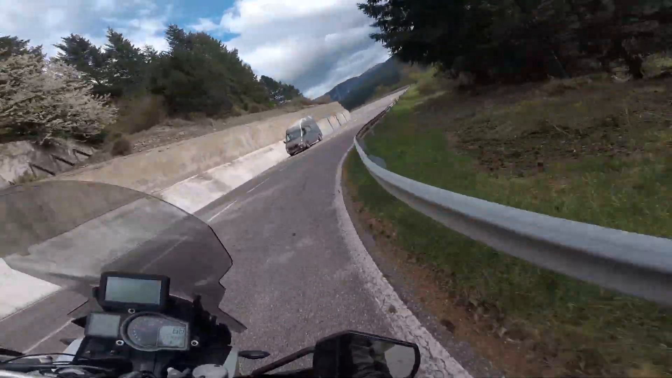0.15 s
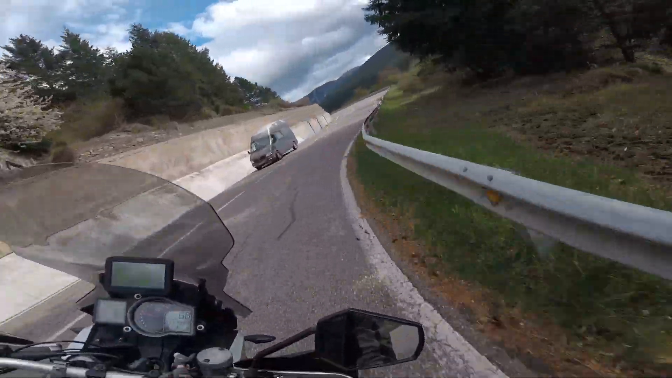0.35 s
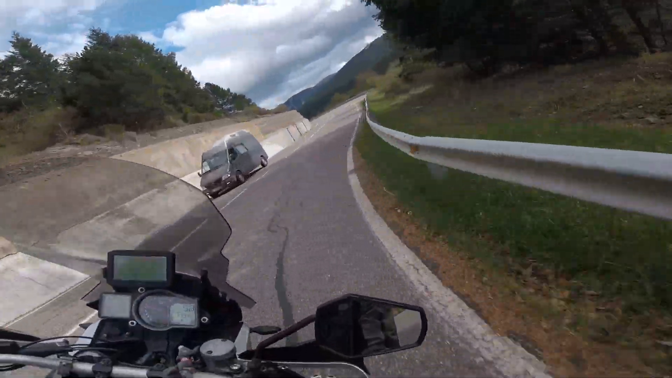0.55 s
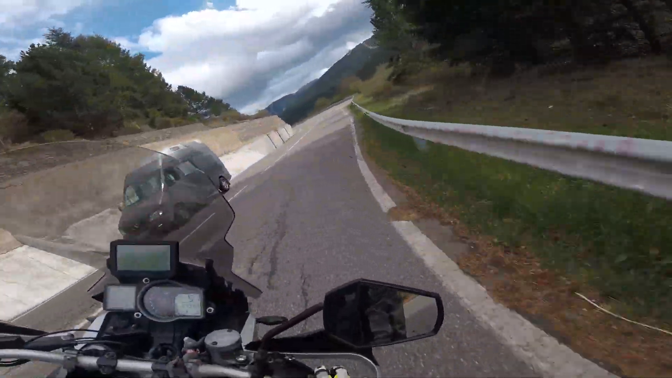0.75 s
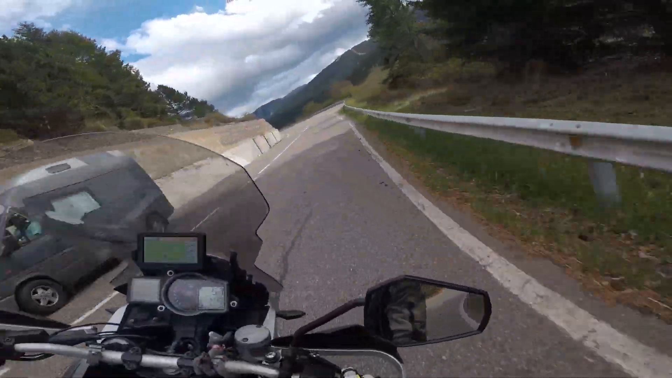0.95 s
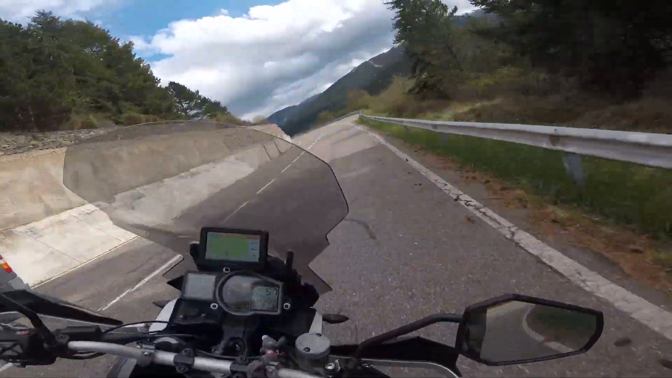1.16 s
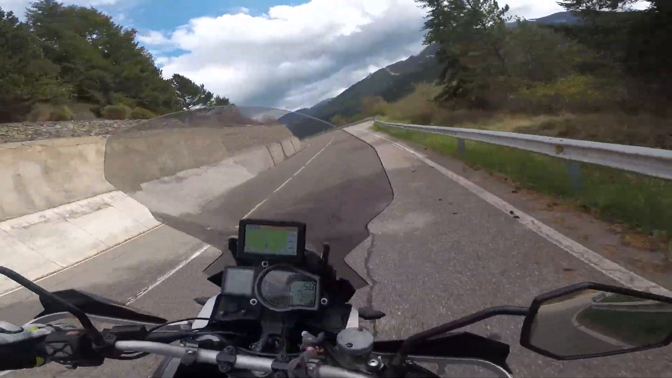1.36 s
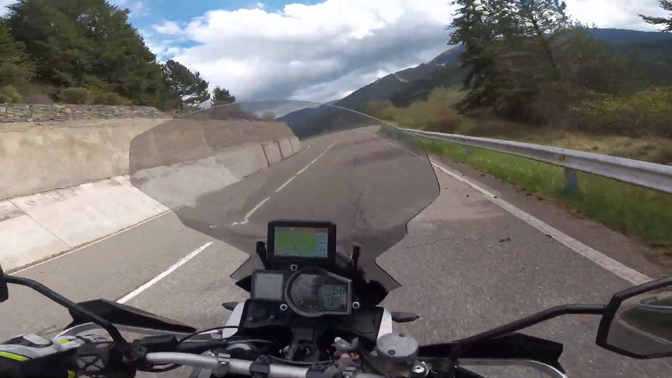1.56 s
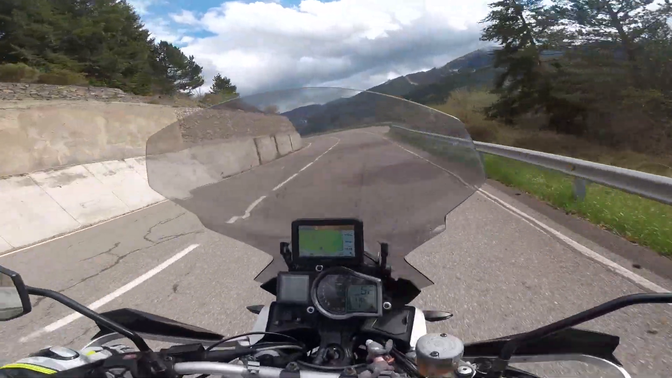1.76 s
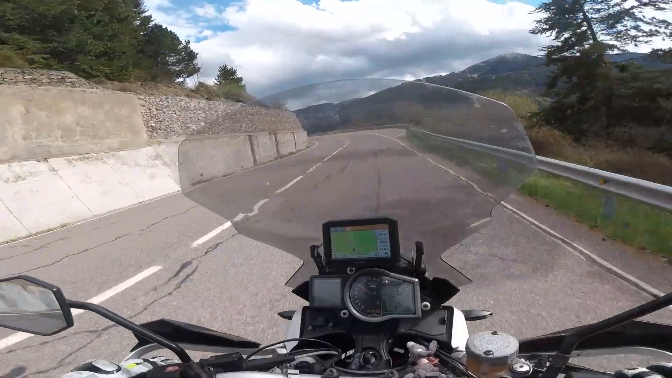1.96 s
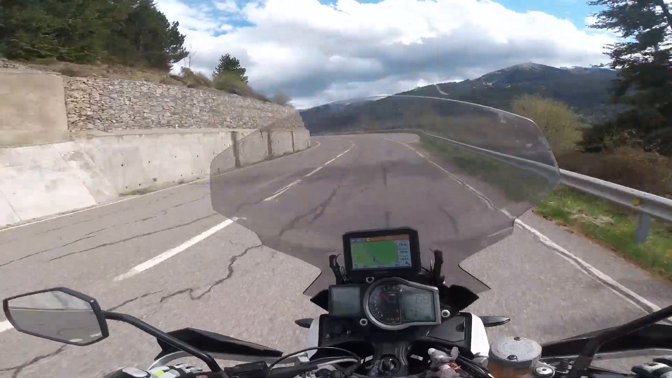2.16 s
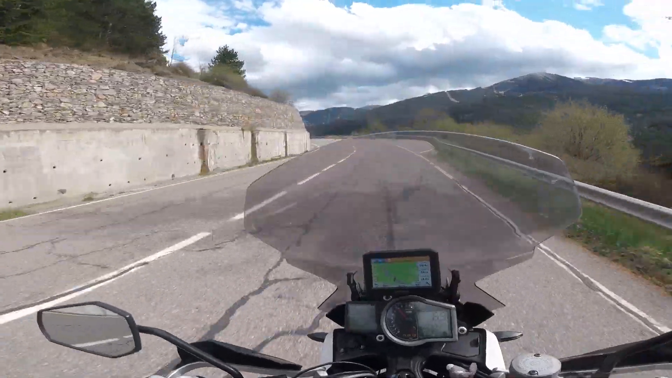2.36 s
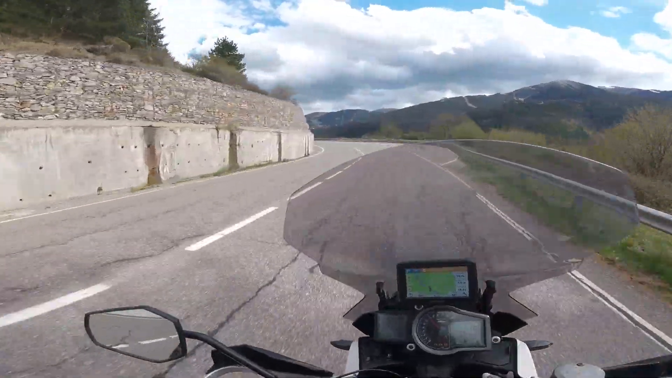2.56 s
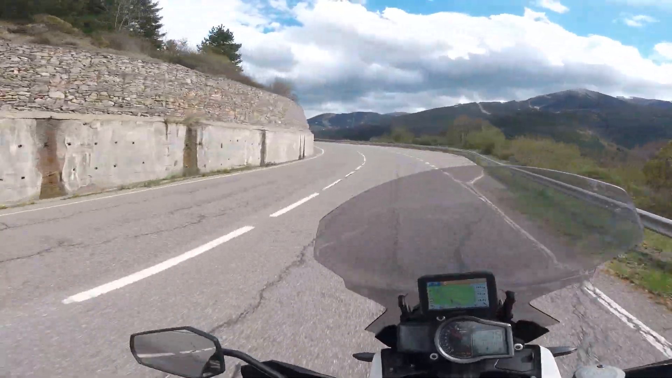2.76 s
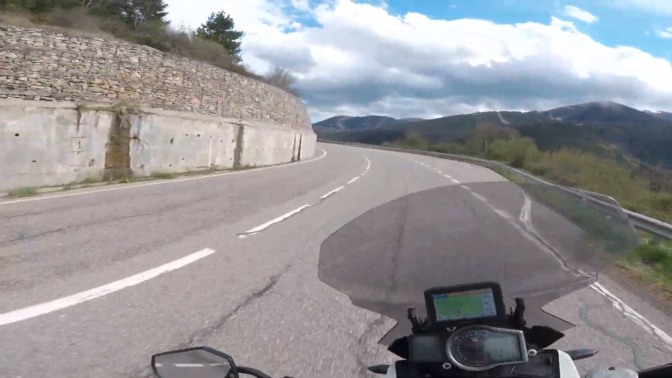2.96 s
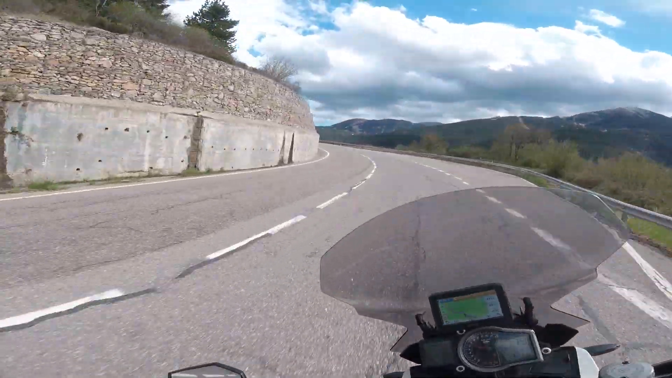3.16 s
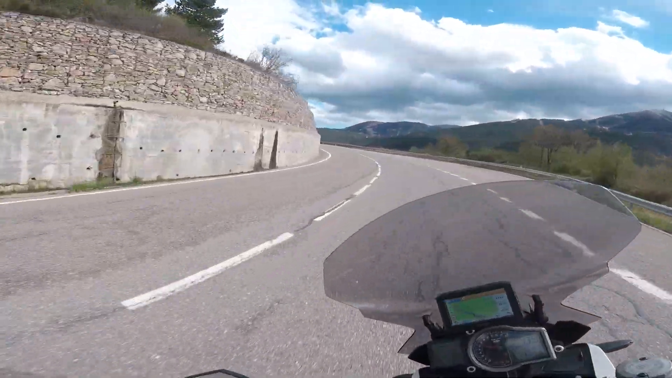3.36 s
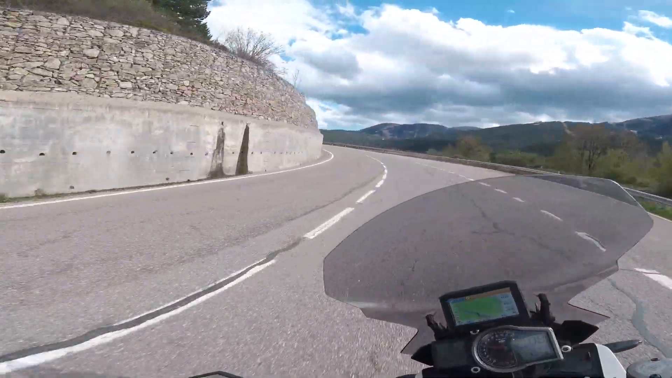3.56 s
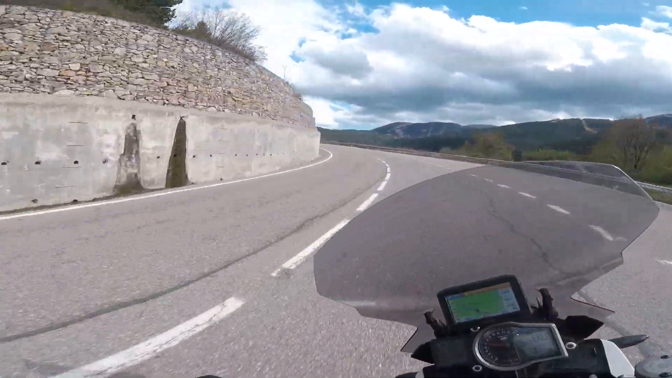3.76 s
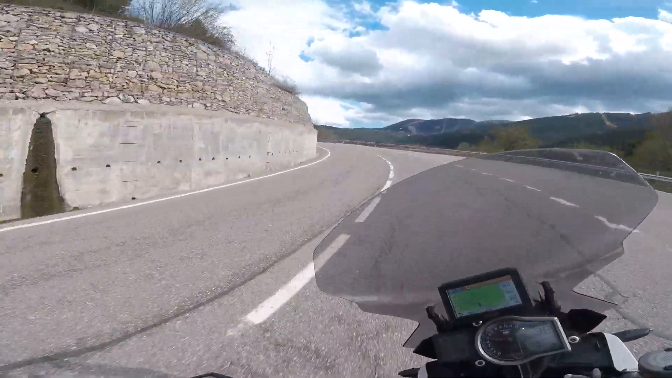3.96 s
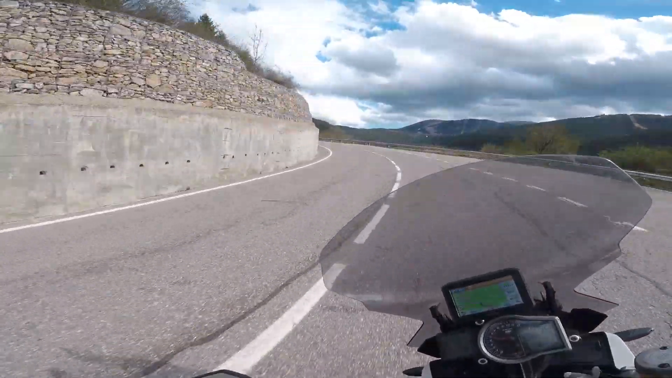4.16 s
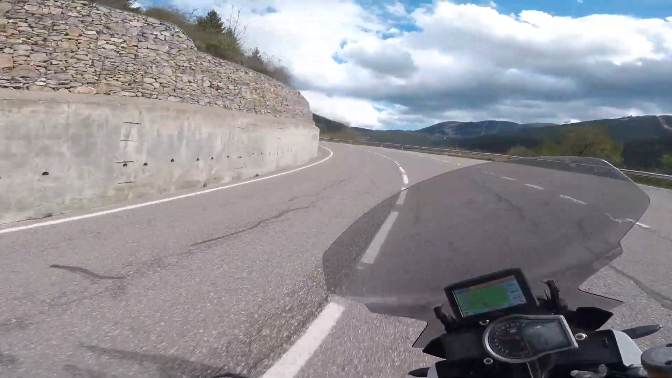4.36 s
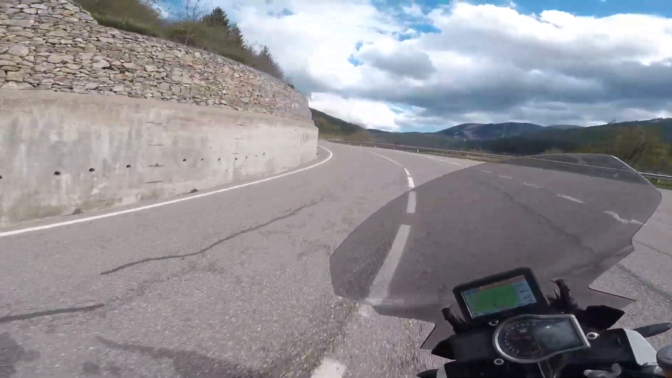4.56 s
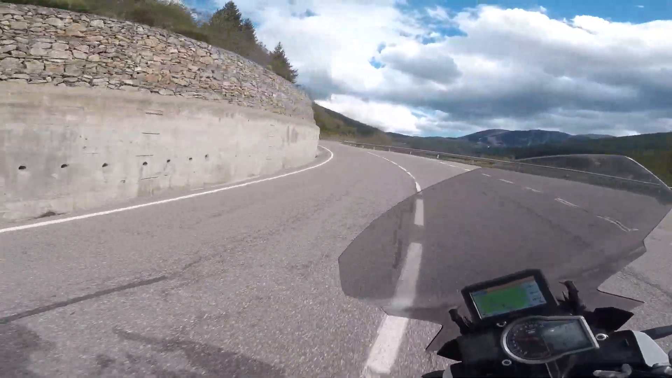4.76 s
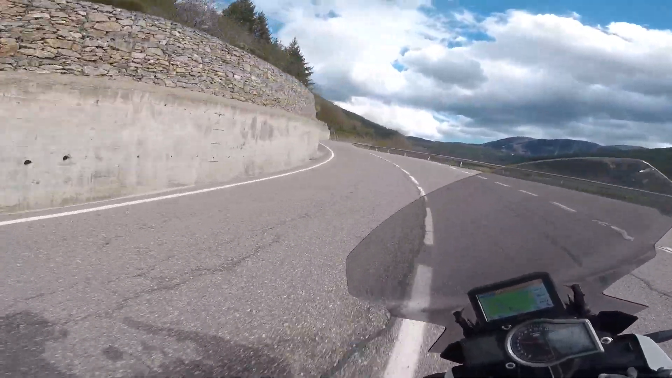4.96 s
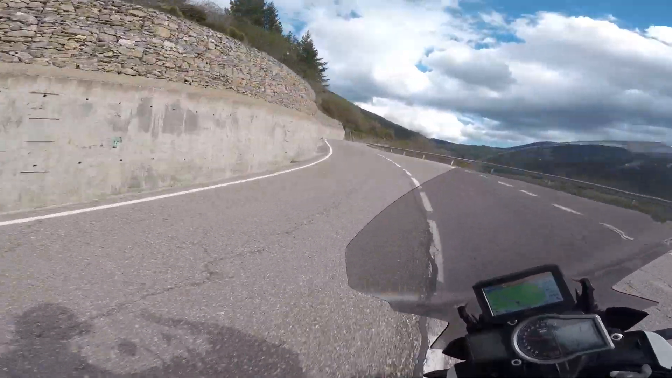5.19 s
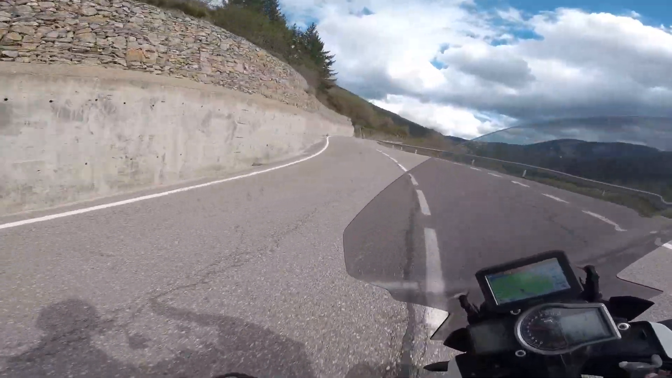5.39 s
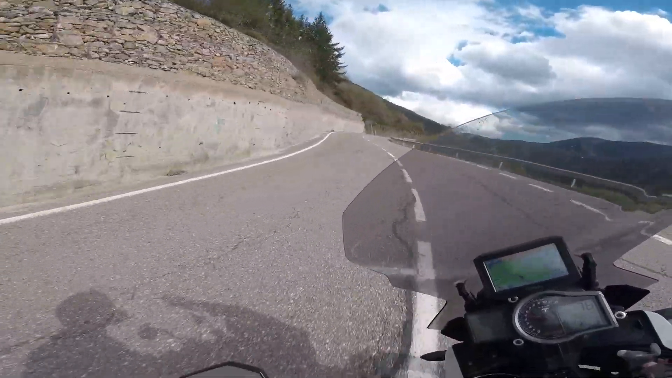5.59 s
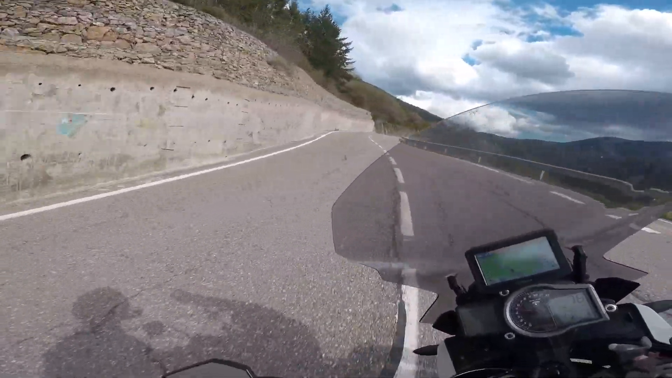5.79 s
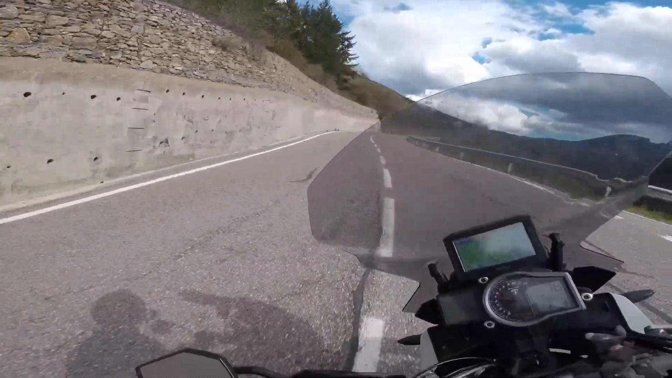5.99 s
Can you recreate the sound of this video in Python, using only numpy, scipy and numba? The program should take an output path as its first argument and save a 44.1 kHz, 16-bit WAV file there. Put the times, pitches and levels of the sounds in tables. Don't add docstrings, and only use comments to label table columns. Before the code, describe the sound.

From the saddle, a V-twin motorcycle pulls hard with barking intake, shuts off with popping exhaust cracks, then drones steadily through a bend in gusting wind.

```python
import sys
import numpy as np
from scipy import signal
from scipy.fft import rfft, irfft, next_fast_len
from scipy.io import wavfile
from scipy.ndimage import uniform_filter1d
from numba import njit

SR = 44100
rng = np.random.default_rng(int(sys.argv[2]) if len(sys.argv) > 2 else 0)


def gain_from_db(level_db):
    decades = np.asarray(level_db, float) / 20
    return 10 ** decades


def inscribe(sig):
    pcm = np.round(np.clip(np.atleast_2d(sig).T, -1, 1) * 32767)
    wavfile.write(sys.argv[1], SR, pcm.astype(np.int16))


N = 265923

# (time [s], peak level [dB], ring [Hz], spray level [dB])
POPS = [
    (2.352, -24, 480, -63),
    (2.389, -19, 299.6, -50),
    (2.55, -34.5, 497, -63.5),
    (2.652, -15, 465.3, -58),
    (2.660, -29.5, 509, -55),
    (2.699, -19.5, 332.9, -63),
    (3.659, -15.5, 485, -65),
    (3.735, -12.5, 306.5, -65),
    (3.973, -41, 355, -58),
]
# (time [s], swing of cycle rate [Hz])
SNATCHES = [
    (1.106, 0.926),
    (2.701, .4),
    (3.906, .8),
]


def controls(table):
    s, *columns = np.transpose(table)
    return [np.interp(np.arange(N) / SR, s, column) for column in columns]


def curve(table, hz):
    f, value = np.transpose(table)
    return np.interp(np.log(np.maximum(hz, 1)), np.log(f), value)


def bump(s, half_s):
    return np.exp(-((np.arange(N) / SR - s) / half_s) ** 2)


def unit(x):
    return x / np.sqrt(np.mean(x ** 2))


def soft(x, hz):
    return signal.sosfilt(signal.butter(4, hz, fs=SR, output="sos"), x)


def decaying(x, fall_s):
    return signal.lfilter([1], [1, -np.exp(-1 / (fall_s * SR))], x)


@njit
def sweep(x, hz, width):
    y, b, l = np.empty(len(x)), 0., 0.
    for i in range(len(x)):
        g, k = np.tan(np.pi * hz[i] / SR), width[i] / hz[i]
        v = (b + g * (x[i] - l)) / (1 + g * (g + k))
        b, l, y[i] = 2 * v - b, l + 2 * g * v, k * v
    return y


def svf(x, hz, width_hz):
    return sweep(x, hz, width_hz + np.zeros(N))


def ring(x, modes, sign=-1):
    total = 0
    for k, (hz, width_hz, db) in enumerate(modes):
        total = total + sign ** k * gain_from_db(db) * svf(x, np.full(N, 1. * hz), 1. * width_hz)
    return total


def panned(x, pan_db, lag_samples):
    late = np.interp(np.arange(N) - lag_samples, np.arange(N), x)
    return np.array([x * gain_from_db(pan_db / 2), late * gain_from_db(-pan_db / 2)])


def walk(rate_hz):
    k = int(SR / rate_hz)
    held = np.repeat(rng.standard_normal(N // k + 1), k)
    return 0.46 * uniform_filter1d(uniform_filter1d(held, k), k)[:N]


def noise(colour, flicker_db, rate_hz):
    # (frequency [Hz], correlation [0-1])
    likeness = [(30, 0.974), (70, 0.917), (150, 0.27), (600, 0.82), (1200, 0.65), (2500, 0.17),
                (4000, 0.61), (12000, 0.28)]
    size = next_fast_len(N)
    hz = np.arange(size // 2 + 1) * SR / size
    alike = np.clip(curve(likeness, hz), 0, 1)
    mid, side = rfft(rng.standard_normal((2, size))) * np.sqrt([1 + alike, 1 - alike])
    both = np.array([mid + side, mid - side]) * gain_from_db(curve(colour, hz))
    out = 0
    for centre_hz in 20 * 2. ** np.arange(10):
        share = np.clip(1 - np.abs(np.log2(np.maximum(hz, 1) / centre_hz)), 0, 1)
        out = out + irfft(both * share, size)[:, :N] * gain_from_db(flicker_db * walk(rate_hz))
    return unit(out)


def mapped(row, hz, throttle):
    cruise_hz = 40
    along = np.interp(throttle, np.linspace(0, 1, len(row) - 1), row[:-1])
    return along + row[-1] * (hz - cruise_hz)


def rocking():
    rock_hz, fall_s = 6.6, .28
    swing = np.zeros(N)
    for s, swing_hz in SNATCHES:
        t = np.maximum(np.arange(N) / SR - s, 0)
        swing += swing_hz * np.sin(2 * np.pi * rock_hz * t) * np.exp(-t / fall_s)
    return swing


def cycle_rate():
    # (time [s], cycle rate [Hz])
    revs = [(0, 34.7), (.12, 35.4), (.2, 37.1), (.22, 36.8), (.27, 34.6), (.34, 35.6), (.42, 35.4),
            (.64, 36.6), (.93, 39.9), (1.1, 43.19), (1.3, 45.12), (1.72, 50.7), (2.06, 56.15), (2.33, 56.4),
            (2.6, 40.9), (2.65, 40.3), (2.74, 42.3), (3.14, 42.2), (3.68, 40.4), (3.9, 40.6), (4.1, 39.6),
            (4.62, 39.05), (5.1, 38.68), (5.26, 38.7), (5.66, 39.2), (5.84, 39.8), (6.03, 40.8)]
    return controls(revs)[0] + rocking()


def burn_scatter(hz, throttle):
    # (throttle shut, half open, wide open, change per Hz)
    scatter_map = (1.1, .6, .6, 0)
    stumble_db, stumble_s = 1.6, .07
    stumble = np.max([bump(s, stumble_s) for s, *rest in POPS], axis=0)
    return mapped(scatter_map, hz, throttle) + stumble_db * stumble


def beats(turns, db, scatter_db):
    cycles = np.arange(np.ceil(turns[0]), turns[-1])
    chance = rng.standard_normal((400, 2))[:len(cycles)]
    jitter = .0012 * scatter_db[np.searchsorted(turns, cycles)] * chance[:, 0]
    at = np.interp(cycles + jitter, turns, np.arange(N))
    i = at.astype(int)
    size = gain_from_db(db[i] + scatter_db[i] * chance[:, 1])
    pulses = np.zeros(N + 1)
    pulses[i] += size * (1 - at + i)
    pulses[i + 1] += size * (at - i)
    return pulses[:N]


def cylinders(turns, scatter_db):
    # (time [s], exhaust delay [cycles], gap between beats [cycles], rear beat [dB], rear gulp [dB])
    timing = [(0, 0.393, 0.51, -2.5, 2), (.2, 0.579, .48, 2, 5.5), (.4, .47, .495, 3.3, 0.48),
              (.8, 0.456, .53, -1.5, -0.28), (1.2, 0.573, .52, -2, -2.5), (1.6, 0.5076, 0.5193, -5, -1.5),
              (2.0, 0.548, .52, -1, -1), (2.1, 0.559, 0.5663, -4, -0.5), (2.33, 0.704, 0.5529, -2, 1),
              (2.6, 0.64, .45, 2, 2), (3.0, 0.692, .445, -2.5, 2.5), (3.7, .62, .447, 1.5, 7),
              (3.85, 0.573, .46, -4.5, 6.5), (4.6, 0.6063, .46, -0.5, 6), (5.1, 0.5396, .5, -1, 0.5),
              (5.4, .45, .51, -2, -1.5), (5.7, 0.4354, .51, -1.5, -1.5), (6.03, .44, .52, -1, -1.5)]
    firing_gap_cycles = .392
    delay, gap, rear_beat_db, rear_gulp_db = controls(timing)
    even, late = np.zeros(N), turns - delay
    gulps = beats(turns, even, scatter_db) + beats(turns - firing_gap_cycles, rear_gulp_db, scatter_db)
    front = beats(late, even, scatter_db)
    puffs = front + beats(late - gap, rear_beat_db, scatter_db)
    return gulps, front, puffs


def suction(gulps, edge_db):
    opening = np.clip(gain_from_db(edge_db), 0, 1)
    return -(1 - opening) * soft(gulps, 592.3) - opening * soft(gulps, 1068)


def airbox(suck, hz, throttle, intake_db, echo_ms, echo_db, airbox_hz, side_db):
    # (frequency [Hz], width [Hz], level [dB])
    side_chambers = [(225, 70, -19), (340, 60, -10)]
    # (shut, half open, wide open, change per Hz)
    width_map = (88, 166, 197, -6)
    chamber_hz_map = (415, 410, 435, 1.6)
    chamber_db_map = (-2, -15.5, -16.5, 1.6485)
    echo = np.interp(np.arange(N) - echo_ms * SR / 1000, np.arange(N), suck)
    bark = suck + gain_from_db(echo_db) * echo
    width_hz = np.maximum(mapped(width_map, hz, throttle), 25)
    chamber = svf(suck, mapped(chamber_hz_map, hz, throttle), 21.0)
    chamber = gain_from_db(mapped(chamber_db_map, hz, throttle) + side_db) * chamber
    box = svf(bark, airbox_hz, width_hz) + ring(bark, side_chambers) + chamber
    return panned(unit(box) * gain_from_db(intake_db), -1.6, 3)


def snorkel_rasp(suck, gulps, puffs, hz, throttle, edge_db, intake_db, snorkel_db, trumpet_db):
    # (frequency [Hz], width [Hz], level [dB])
    snorkel_modes = [(509.6, 25, -5.5), (578, 21, -20.5), (663, 12, -11.5), (704.8, 38, 9),
                     (775.5, 81, 3.5)]
    trumpet_modes = [(908.7, 93, 1.5), (1119, 100, -2.5), (1800, 59, -4), (1513, 99, -14.5)]
    # (shut, half open, wide open, change per Hz)
    rasp_map = (-33, -11, -11.5, 0.3692)
    crack_map = (-2.5, -13.5, -18.5, 0.4928)
    driven = suck + gain_from_db(mapped(crack_map, hz, throttle)) * soft(puffs, 910)
    snorkel = soft(ring(driven, snorkel_modes, sign=0.928), 1100)
    trumpets = ring(-soft(gulps, 1300), trumpet_modes)
    rasp = unit(snorkel + gain_from_db(edge_db + trumpet_db - snorkel_db) * trumpets)
    return panned(rasp * gain_from_db(intake_db + mapped(rasp_map, hz, throttle) + snorkel_db), .7, 2.5)


def gas_hiss(gulps, hz, throttle):
    # (frequency [Hz], density [dB per Hz])
    hiss_colour = [(500, 0.5), (1000, -5), (1800, -17), (2600, -22), (4000, -30.5), (6000, -37),
                   (7500, -47), (8600, -42), (9600, -58.5), (10400, -48.5), (11000, -58.5), (11800, -61),
                   (13000, -80.5)]
    # (shut, half open, wide open, change per Hz)
    hiss_map = (-67.5, -64, -55, 0.4)
    depth_map = (0.11, 0.14, .45, 0.0043)
    gate = 1 + mapped(depth_map, hz, throttle) * unit(decaying(soft(gulps, 700), 0.0027))
    return gate * noise(hiss_colour, 1.5, 25) * gain_from_db(mapped(hiss_map, hz, throttle) + 11.5)


def tappets(turns, hz, throttle):
    # (share of the cycle [cycles], level [dB])
    seatings = [
        (0.121, -0.5),
        (.31, -2.5),
        (0.551, -1.5),
        (.83, -4.5),
    ]
    # (shut, half open, wide open, change per Hz)
    tappet_map = (-84, -79, -72, 0.1067)
    even = np.zeros(N)
    seats = sum(beats(turns - at, even + db, even + 3) for at, db in seatings)
    clatter = decaying(seats, 0.0019) * rng.standard_normal((2, N))
    clatter = clatter + .4 * clatter[::-1]
    ticks = np.array([svf(side, even + 2900.0, 1900.) for side in clatter])
    return unit(soft(ticks, 6500)) * gain_from_db(mapped(tappet_map, hz, throttle) - 6 * bump(0, .6))


def frame_shake(front, puffs, hz, throttle):
    # (shut, half open, wide open, change per Hz)
    shake_map = (-40, -43, -36, 0.1872)
    crank = svf(svf(-soft(puffs, 377), 2 * hz, 41.0), 2 * hz, 41.0)
    rock = svf(svf(soft(front, 2000), hz, 9.2), hz, 9.2)
    shake = unit(crank / hz) * gain_from_db(mapped(shake_map, hz, throttle)) + unit(rock / hz) * gain_from_db(-53.5)
    return panned(shake, -2.3, 0)


def header_boom(front):
    # (time [s], resonance [Hz], level [dB])
    header = [(0, 100, -32), (.25, 98.7, -44), (.4, 83.22, -47), (.8, 115.9, -55.5), (1.2, 160.7, -44.5),
              (1.5, 188.7, -31), (1.8, 191.8, -30.5), (2.0, 186.1, -30), (2.2, 195.4, -29.5),
              (2.34, 191.5, -35), (2.45, 166.9, -40), (2.7, 136.1, -36.5), (3.7, 127.4, -38.5),
              (4.6, 125.3, -40.5), (5.0, 124.7, -39.5), (5.25, 159, -42.5), (5.7, 160.7, -45.5),
              (6.03, 150, -46.5)]
    header_hz, header_db = controls(header)
    boom = svf(svf(soft(front, 2700), header_hz, 55.0), header_hz, 55.0)
    return panned(unit(boom) * gain_from_db(header_db), -2.3, 0)


def silencer_drone(puffs, drone_hz, drone_db):
    drone = svf(-soft(puffs, 377), drone_hz, 31.0)
    return panned(unit(drone) * gain_from_db(drone_db), -2.2, 0.45)


def tailpipe_thump(turns, scatter_db, hz, throttle, thump_db):
    # (shut, half open, wide open, change per Hz)
    phase_map = (.74, .73, 0.7218, 0.00332)
    thump_hz_map = (240, 402, 158.5, 0.37)
    pulses = beats(turns - mapped(phase_map, hz, throttle), np.zeros(N), scatter_db)
    thump_hz = np.clip(mapped(thump_hz_map, hz, throttle), 150, 600)
    thump = svf(-soft(pulses, 700), thump_hz, 220.0)
    return panned(unit(thump) * gain_from_db(thump_db), -2.2, 0.45)


def engine():
    # (time [s], throttle [0-1], intake level [dB], drone level [dB], thump level [dB])
    load = [(0, .05, -37, -40, -66), (.12, .05, -44, -40.5, -48.5), (.2, 0.2, -35, -33, -43),
            (.27, 0.2, -34.5, -43.5, -49.5), (.34, .4, -34, -38, -45.5), (.62, .4, -31, -35, -40),
            (.8, 0.86, -27.5, -38.5, -39), (1.02, .81, -24.5, -34, -39.5), (1.09, 0.85, -21, -27, -42.5),
            (1.27, 0.98, -20.5, -36, -47.5), (1.5, 0.93, -22, -33, -37.5), (1.72, 0.85, -23, -45.5, -45),
            (2.0, 0.82, -26, -27, -42), (2.08, 0.83, -31, -32.5, -40.5), (2.22, 0.55, -34, -26, -35),
            (2.32, .55, -38, -26.5, -44), (2.36, .45, -41, -34, -55.5), (2.45, .3, -34.5, -26, -55),
            (2.58, .07, -37, -37.5, -45.5), (2.75, .06, -36.5, -35, -48), (3.2, 0.07, -36.5, -36, -51.5),
            (3.7, 0, -40.5, -36.5, -51), (3.8, 0.3, -40.5, -30, -48), (4.0, 0, -40.5, -28, -53.5),
            (4.1, .18, -43, -29, -60.5), (4.64, .11, -43.5, -32, -61), (5.1, .35, -33, -34.5, -48),
            (5.5, .55, -31.5, -37.5, -49.5), (5.8, .67, -30, -32, -38.5), (6.03, .78, -29.5, -35.5, -35.5)]
    # (time [s], runner round trip [ms], echo level [dB], silencer [Hz], airbox [Hz])
    pipes = [(0, 3.1, -5, 220.9, 321.7), (.3, 3, -6, 255.5, 306.9), (.6, 3, -2, 245.6, 312.4),
             (.9, 2.95, -2.5, 233.9, 355.3), (1.3, 2.9, -1.5, 226.4, 341), (1.6, 3.1, -7.5, 200.2, 347.8),
             (2.0, 2.2, -6.5, 203.2, 353.6), (2.08, 2.8, -13.5, 280.4, 342.7),
             (2.33, 3.3, -12.5, 278.3, 316), (2.42, 3, -9, 239.1, 321.1), (2.55, 3.2, -6.5, 215.1, 325.5),
             (2.7, 3.3, -8.5, 209, 308.9), (3.2, 3.4, -5, 208.8, 304.9), (3.7, 3.4, -6.5, 210.1, 312.2),
             (3.8, 3.8, -4.5, 241.9, 322), (4.1, 4.4, -2.5, 228, 318), (4.8, 3.65, -5.5, 227.5, 324.3),
             (5.3, 3.4, -1, 239.6, 295.6), (5.7, 3.2, -5.5, 243.2, 316), (6.03, 3.1, -6.5, 241.6, 332.7)]
    # (time [s], side chamber [dB], snorkel [dB], throttle bodies [dB])
    singing = [(0, 0, -1.5, 4), (.3, -1, -.5, 4.5), (.7, .5, -0.5, 2.5), (1.1, 0, 1, 0.5),
               (1.5, -1.5, .5, 2), (1.95, -4.5, .5, 3), (2.1, 0, 1.5, 5.5), (2.28, -1, 1.5, 3),
               (2.36, -6, 0.5, 1.5), (2.7, 0, .5, 1.5), (3.6, -.5, -1, .5), (3.8, -1.5, 2, .5),
               (4.1, -1, -0.5, -.5), (4.9, -1, .5, -.5), (5.4, -2, 1, -1), (6.03, -2, 2, 1.5)]
    # (shut, half open, wide open, change per Hz)
    edge_map = (-10, -21, -12, 0.5)
    throttle, intake_db, drone_db, thump_db = controls(load)
    echo_ms, echo_db, drone_hz, airbox_hz = controls(pipes)
    side_db, snorkel_db, trumpet_db = controls(singing)
    hz = cycle_rate()
    turns = np.cumsum(hz) / SR + .92
    scatter_db = burn_scatter(hz, throttle)
    gulps, front, puffs = cylinders(turns, scatter_db)
    edge_db = mapped(edge_map, hz, throttle)
    suck = suction(gulps, edge_db)
    out = airbox(suck, hz, throttle, intake_db, echo_ms, echo_db, airbox_hz, side_db)
    out = out + snorkel_rasp(suck, gulps, puffs, hz, throttle, edge_db, intake_db, snorkel_db, trumpet_db)
    out = out + gas_hiss(gulps, hz, throttle) + tappets(turns, hz, throttle)
    out = out + frame_shake(front, puffs, hz, throttle) + header_boom(front)
    out = out + silencer_drone(puffs, drone_hz, drone_db)
    return out + tailpipe_thump(turns, scatter_db, hz, throttle, thump_db)


def running_gear():
    # (frequency [Hz], density [dB per Hz])
    whirr_colour = [(150, -8.5), (400, -4.5), (800, -13), (1250, -28.5), (1500, -25.5), (2200, -37.5),
                    (3000, -35), (3800, -43), (4700, -43.5), (6000, -50.5), (7500, -61), (10000, -75.5),
                    (13500, -110)]
    whirr_db, slow_start_db, slow_start_s = -46, -2, 0.44
    return noise(whirr_colour, 3.6, 31) * gain_from_db(whirr_db + slow_start_db * bump(0, slow_start_s))


def wind():
    # (frequency [Hz], density [dB per Hz])
    wind_colour = [(15, -15.5), (27, -1.5), (45, 6), (65, 0), (95, -10.5), (150, -20.5), (250, -21),
                   (500, -43.5), (2500, -120)]
    # (time [s], peak level [dB], half length [s])
    gust_table = [(1.605, -51, 0.32), (2.147, -44, 0.35), (2.753, -38.5, 0.11), (3.109, -40, 0.3),
                  (3.53, -44.5, 0.14), (3.946, -46.5, 0.085), (4.55, -39.5, .12), (4.937, -44, 0.14),
                  (5.252, -45.5, 0.085), (5.745, -44, 0.33), (6.03, -43.5, 0.088), (4.306, -49, 1.2)]
    calm_db = -61
    gusts = gain_from_db(calm_db) + sum(gain_from_db(db) * bump(s, half_s) for s, db, half_s in gust_table)
    return noise(wind_colour, 5, 9) * gusts * gain_from_db(np.array([[-1.1], [1.1]]))


def afterfire():
    out, t = np.zeros(N), np.arange(1500) / SR
    swell = (1 - np.exp(-t / 0.00088)) ** 2
    for s, db, hz, spray_db in POPS:
        grit = rng.standard_normal(len(t))
        grit = soft(grit, 2500) + .3 * soft(grit, 6500)
        tone = np.sin(2 * np.pi * hz * t) * np.exp(-t / .0025)
        spray = gain_from_db(spray_db - db) * 3 * grit * np.exp(-t / .008)
        start = int(s * SR)
        out[start:start + len(t)] += gain_from_db(db) * (tone + spray) * swell
    return panned(out, -.6, 2.3)


def scene():
    return engine() + running_gear() + wind() + afterfire()


def top_cut(x):
    return signal.sosfilt(signal.butter(12, 12900, fs=SR, output="sos"), x)


def record(dry):
    tick_db, tick_fall_s = -50, 0.00043
    tick = gain_from_db(tick_db) * rng.standard_normal(N) * np.exp(-np.arange(N) / (tick_fall_s * SR))
    ending = np.minimum((N - np.arange(N)) / 200, 1)
    return top_cut(dry * ending + tick)


dry = scene()
out = record(dry)
inscribe(out)
```